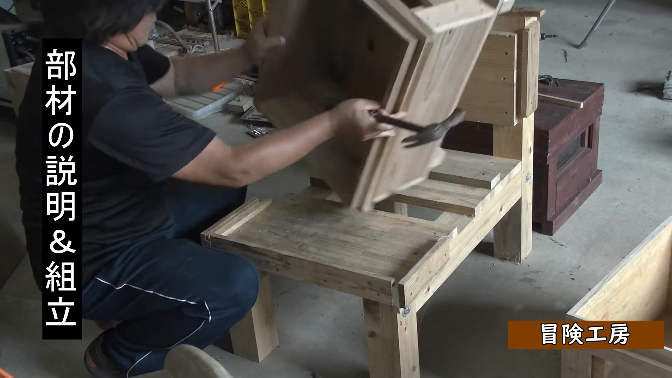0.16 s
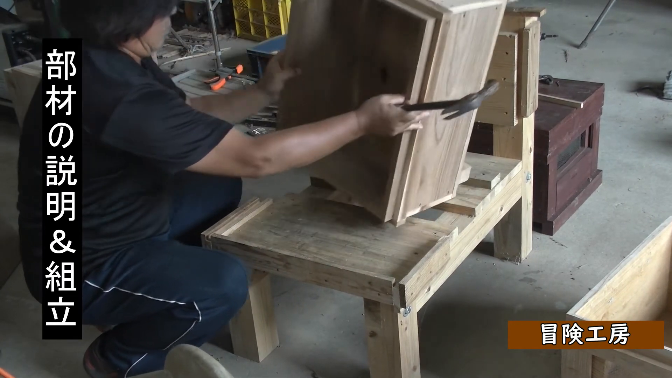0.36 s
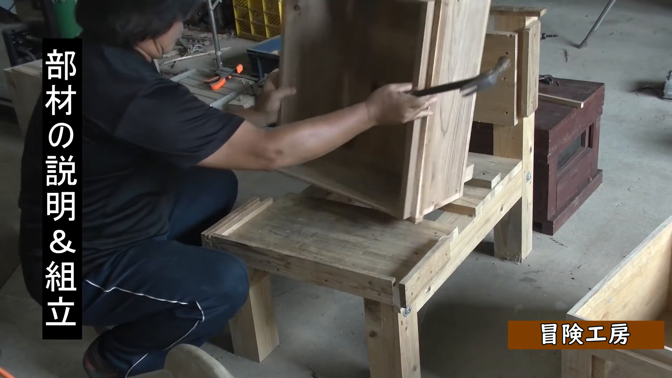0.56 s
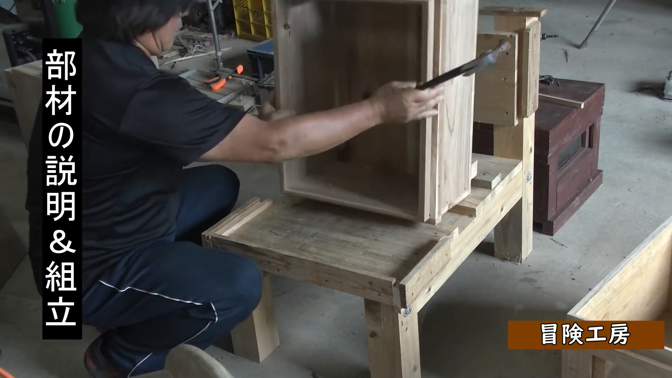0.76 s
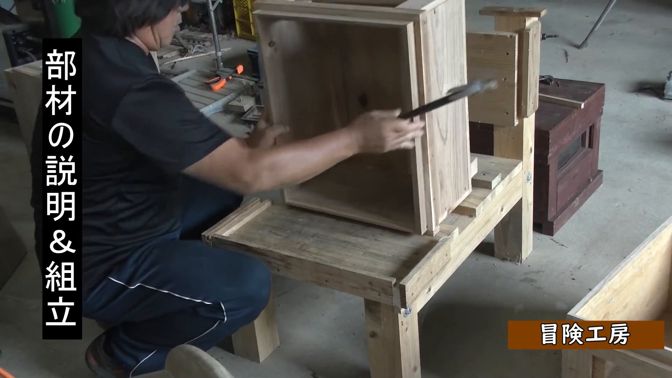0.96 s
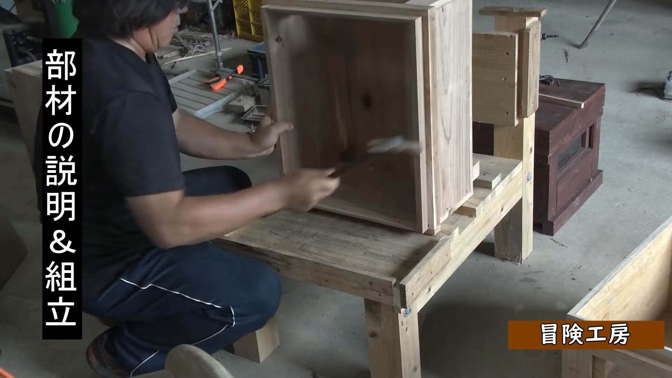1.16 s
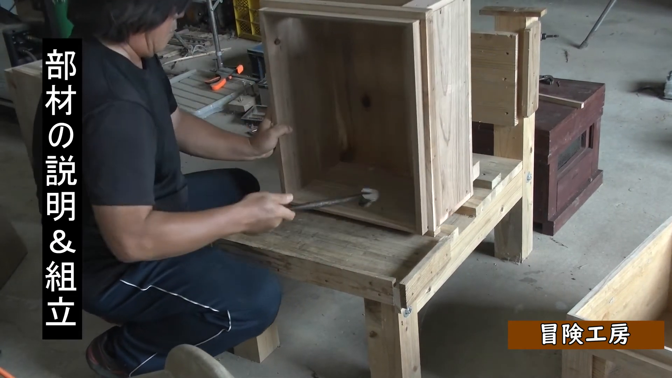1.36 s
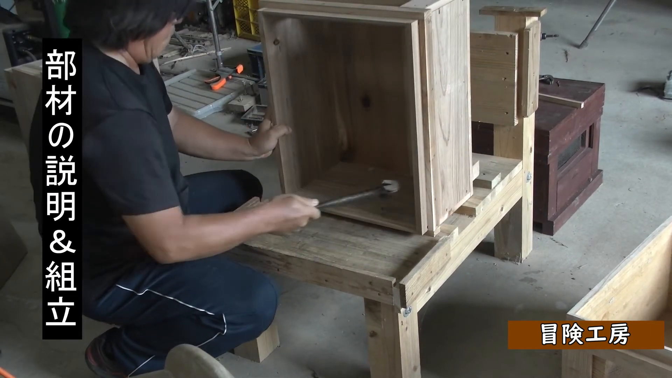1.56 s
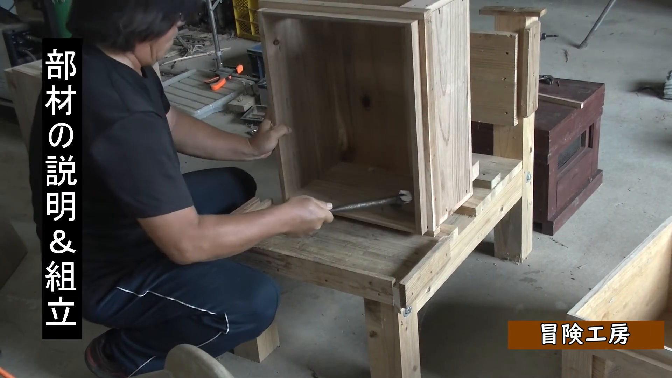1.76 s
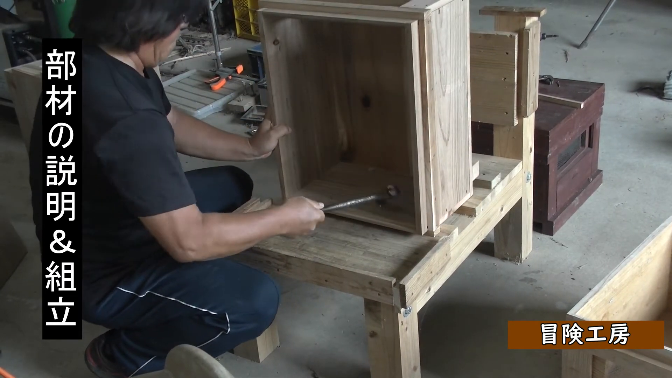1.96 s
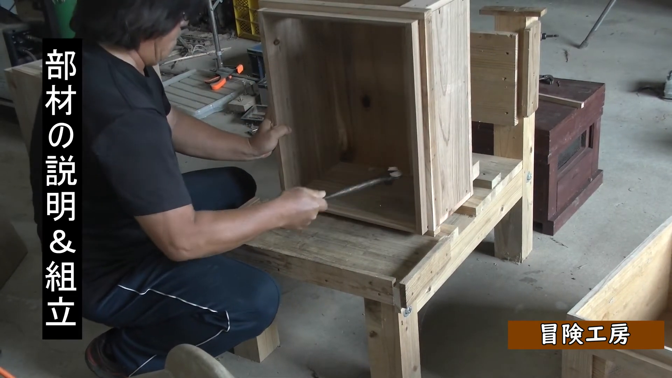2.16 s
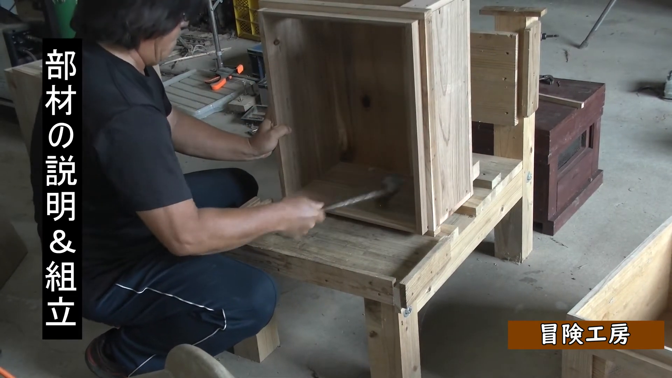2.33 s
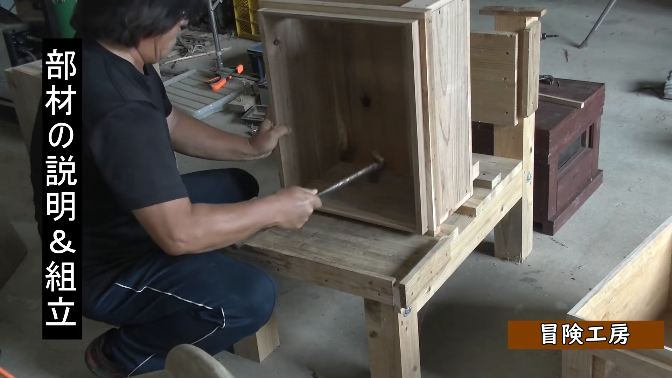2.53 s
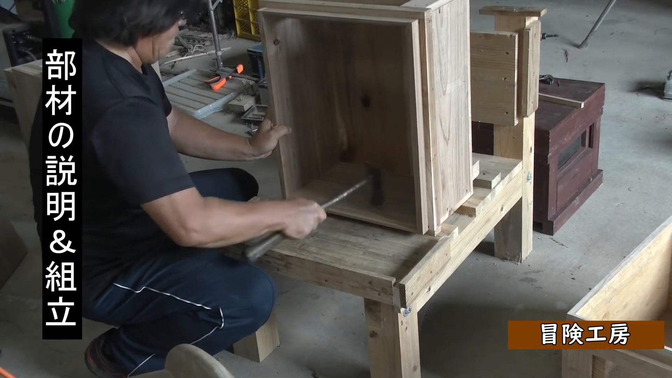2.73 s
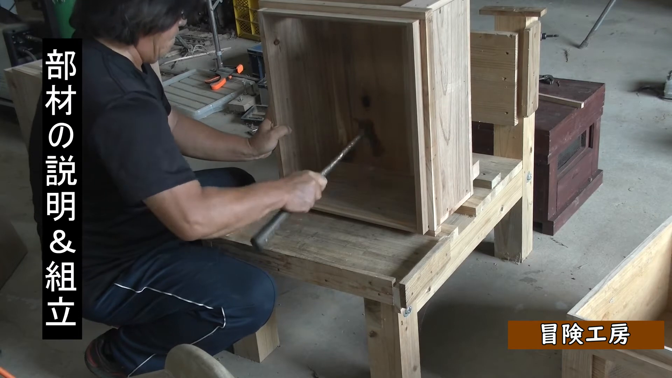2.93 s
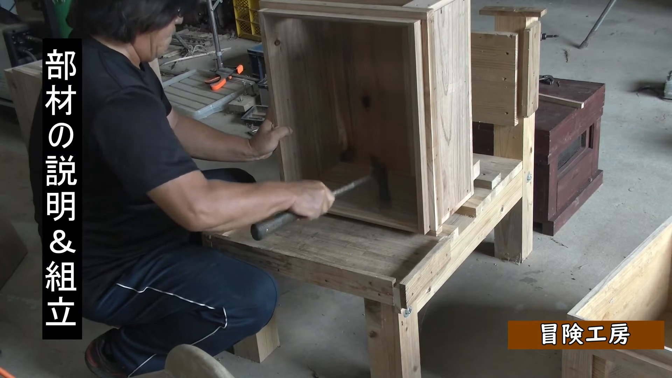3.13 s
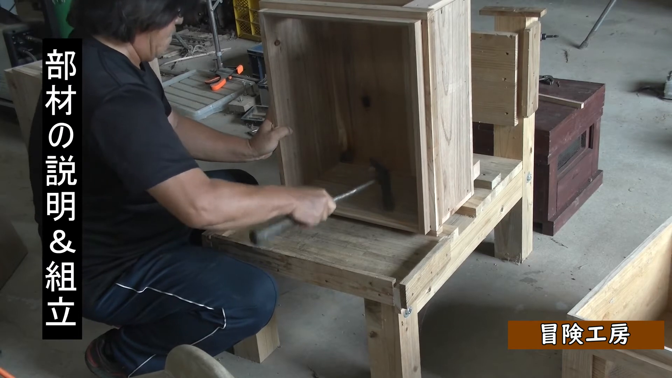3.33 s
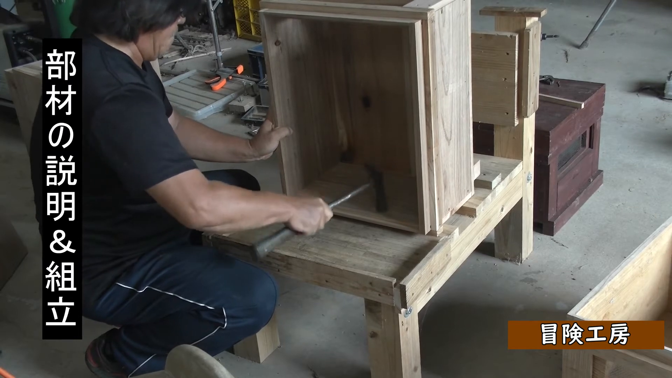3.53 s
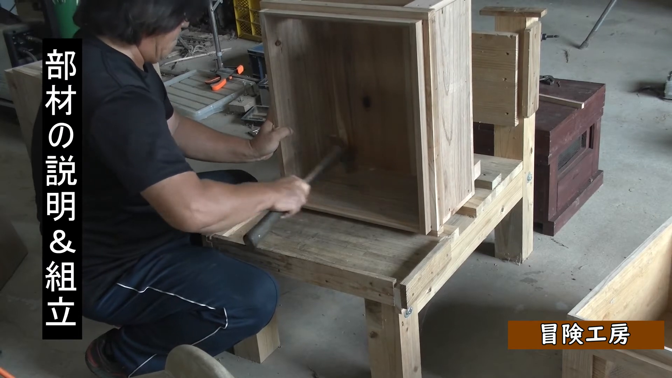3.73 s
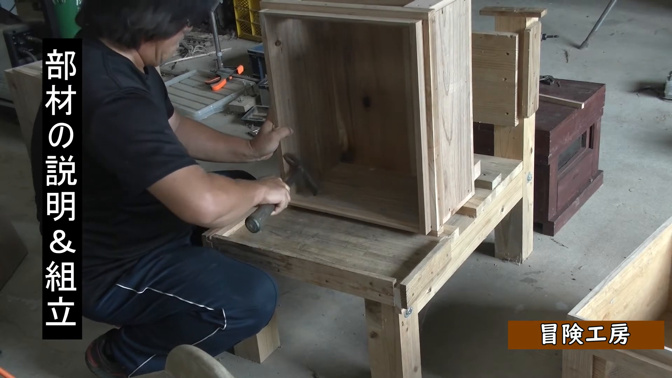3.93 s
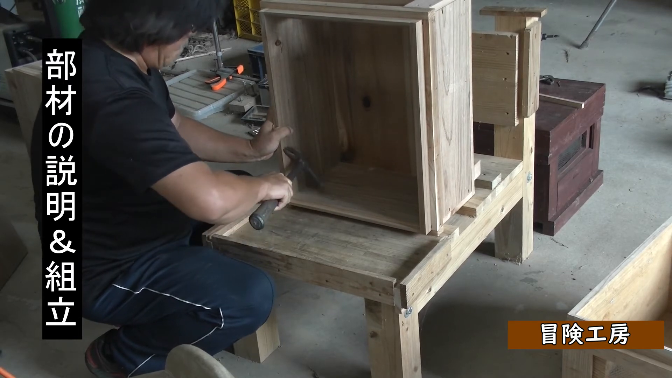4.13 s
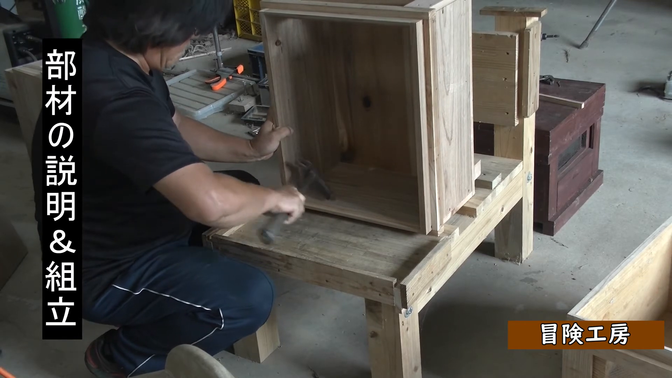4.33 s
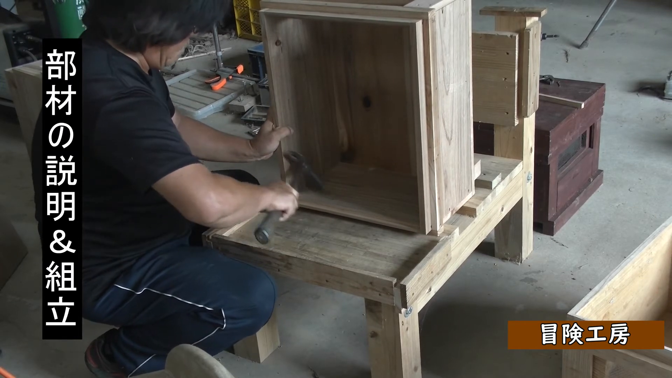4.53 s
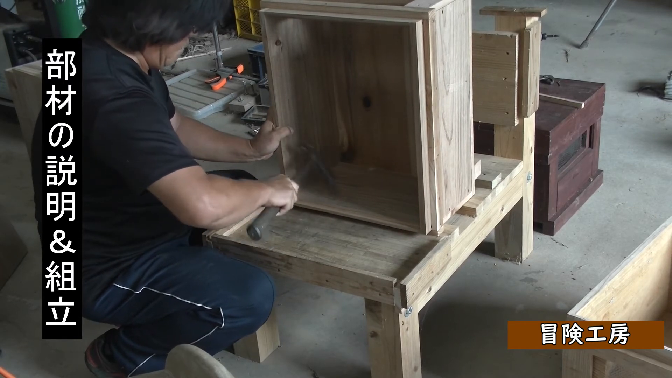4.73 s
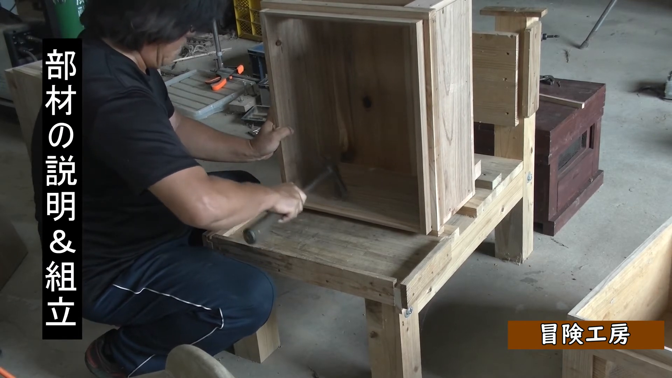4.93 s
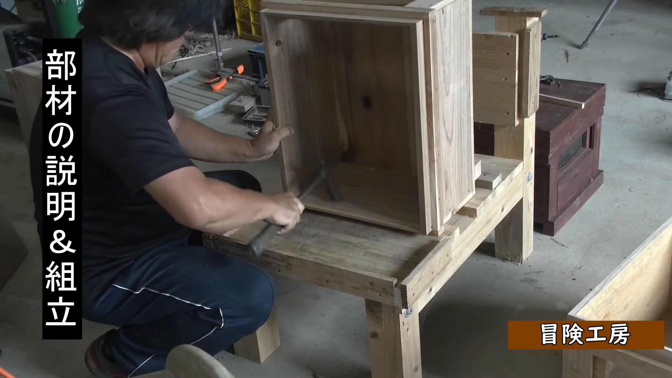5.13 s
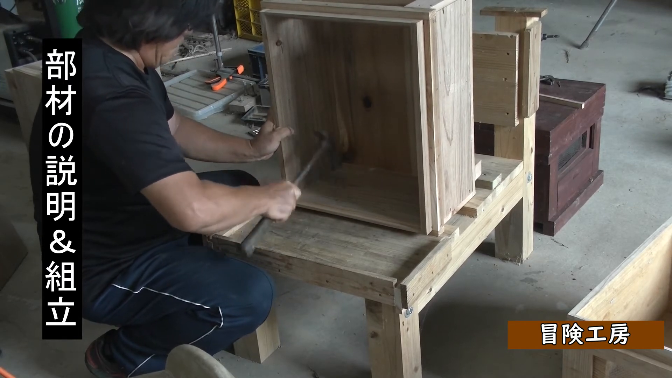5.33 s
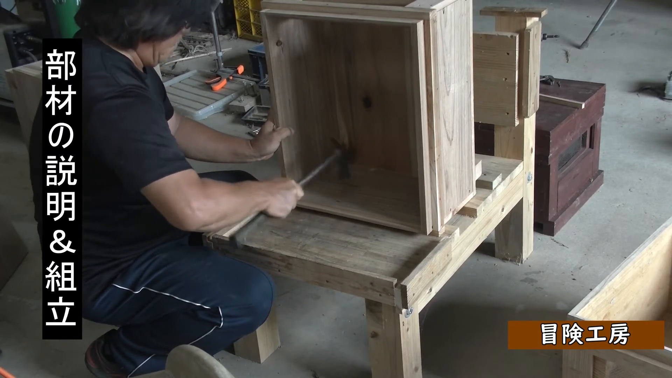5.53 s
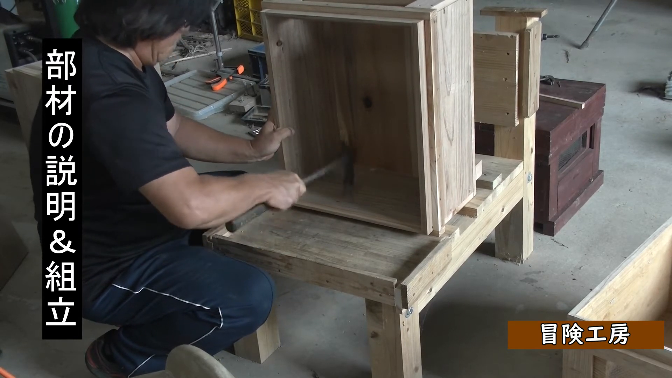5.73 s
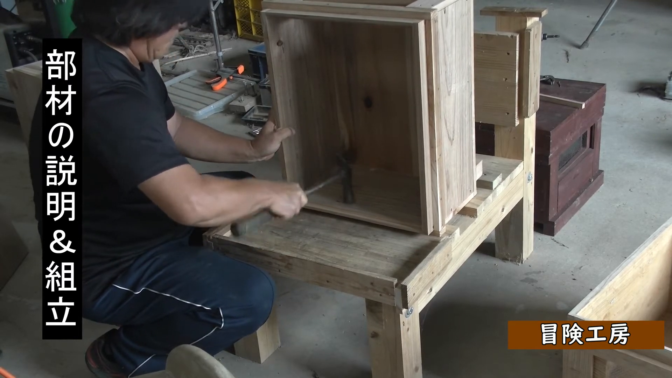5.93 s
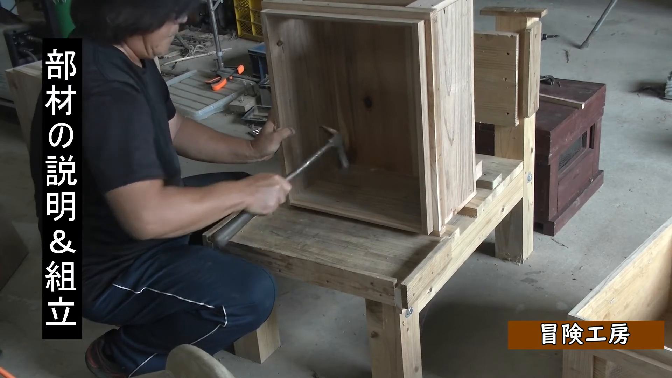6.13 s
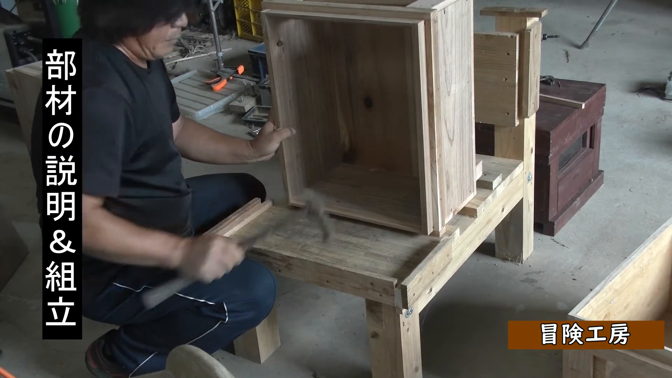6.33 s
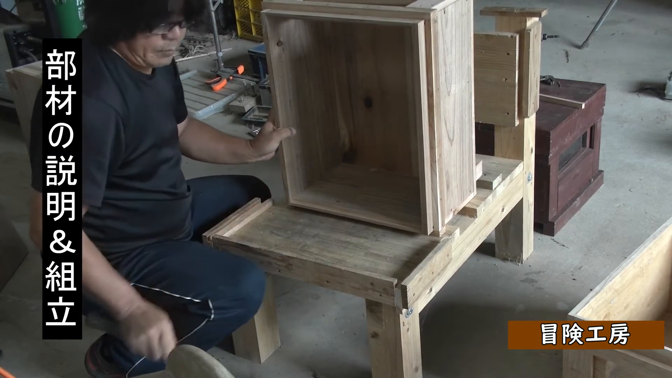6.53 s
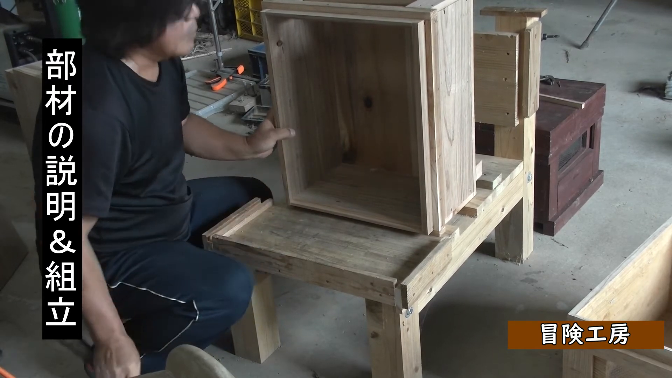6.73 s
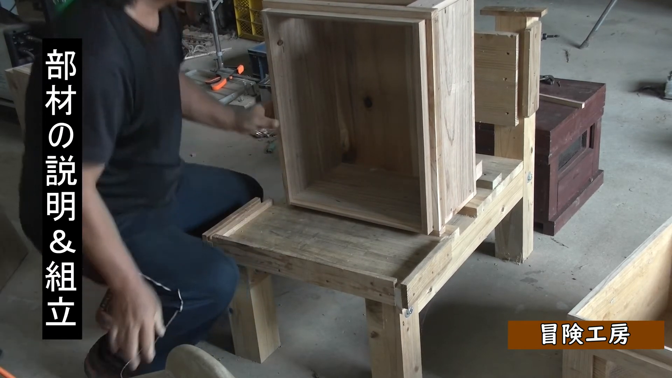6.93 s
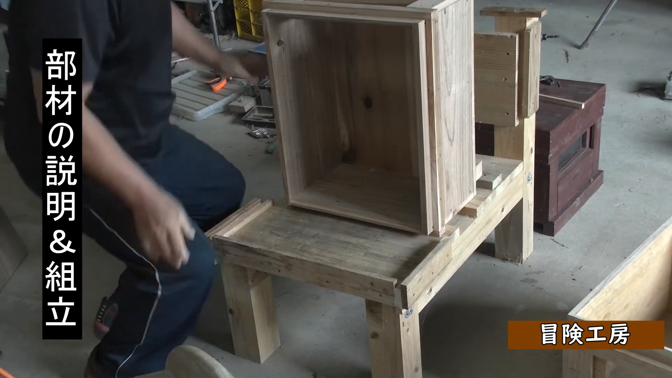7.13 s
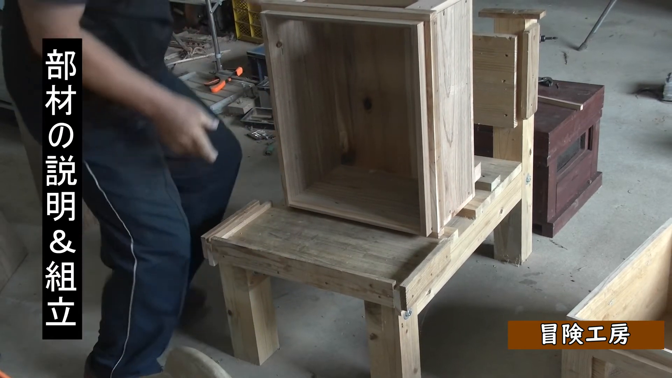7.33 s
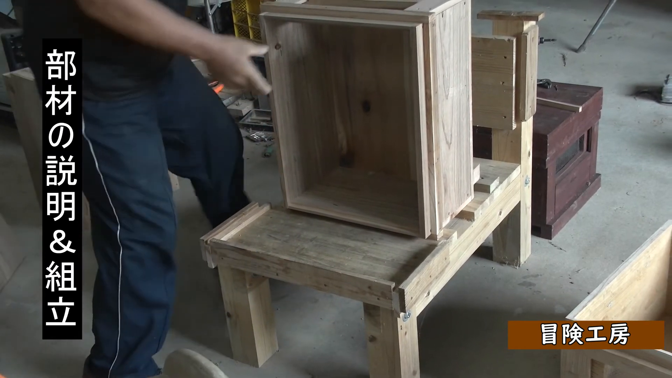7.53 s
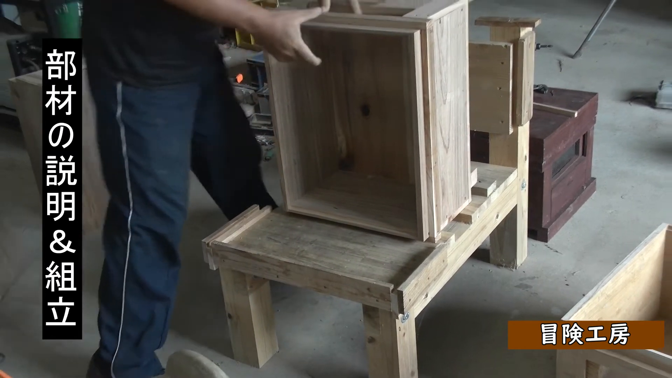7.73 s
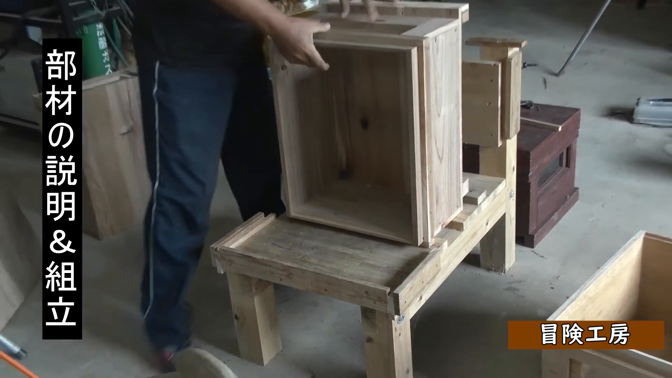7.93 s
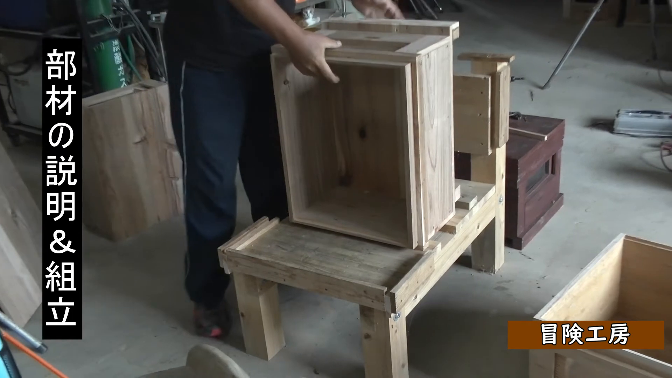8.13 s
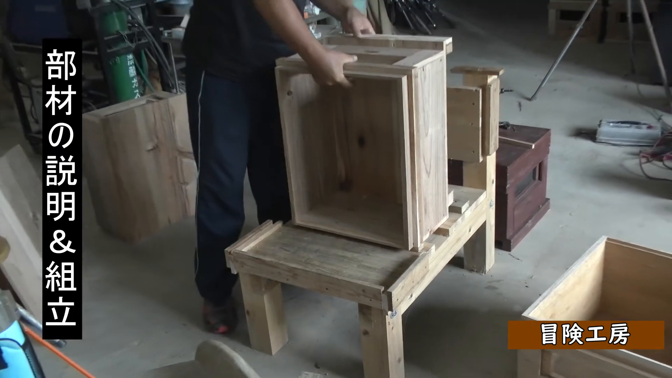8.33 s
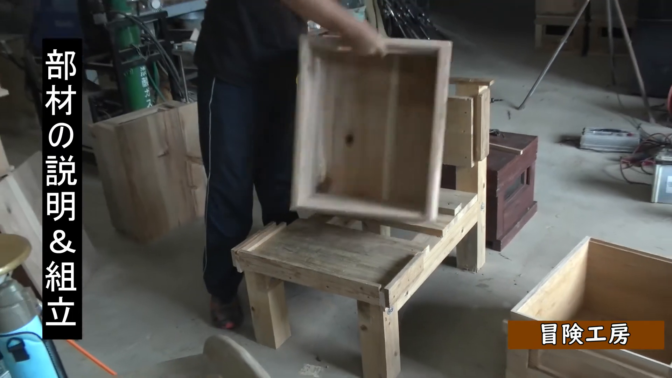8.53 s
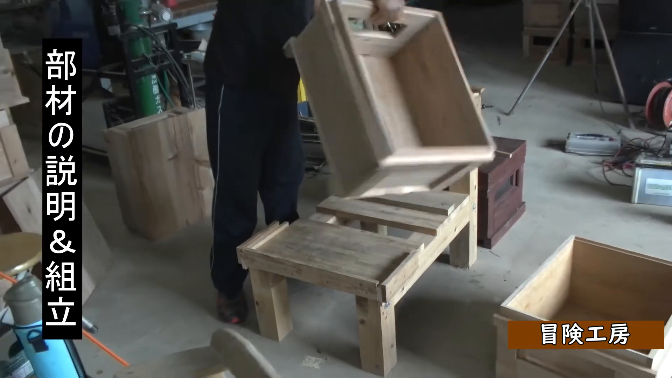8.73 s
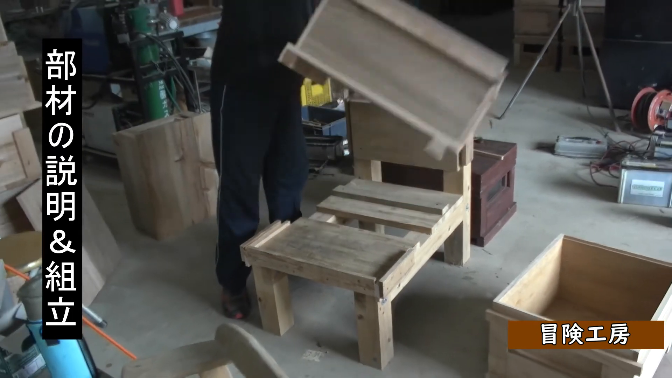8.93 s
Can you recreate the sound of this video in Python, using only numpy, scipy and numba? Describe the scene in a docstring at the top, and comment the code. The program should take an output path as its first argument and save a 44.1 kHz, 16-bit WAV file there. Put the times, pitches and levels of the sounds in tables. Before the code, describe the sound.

In a hard-walled workshop, a wooden box bumps down on a low bench and rattles to rest. A claw hammer cracks against its panels, spaced at first, then faster, pauses, and resumes with light taps growing hard. The hammer clatters onto the floor, two dull steps follow, and a board claps sharply. A far machine whines over soft hiss. Close stereo pickup; loud knocks are squashed and the room swells behind them.

```python
"""A wooden box is set down on a low bench in a hard-walled workshop and rocks to rest. A claw hammer knocks its
panels home, close to a microphone pair, and the box hops under the blows; then the hammer is laid on the floor,
steps follow, and a board is clapped on the box. Struck things sound as damped modes plus a crack of noise.
A limiter ducks the loud knocks, so the room swells up behind them.
Throughout, a far machine whines, flaring now and then into a clear tone, over a filtered-noise outdoor hiss."""
import sys
import numpy as np
from scipy import signal
from scipy.fft import rfft, irfft, next_fast_len
from scipy.io import wavfile
from numba import njit

SR = 44100
rng = np.random.default_rng(int(sys.argv[2]) if len(sys.argv) > 2 else 0)


def to_wav(sig):
    """Store sig (one row per channel, or 1-D mono) as 16-bit WAV at the path in sys.argv[1].

    Samples outside -1..1 are clipped; the rate is SR.
    """
    pcm = np.clip(np.atleast_2d(sig), -1, 1) * 32767
    pcm = np.round(pcm).astype(np.int16)
    wavfile.write(sys.argv[1], SR, pcm.T)  # frames by channels


N = 399987  # length in samples

# All levels are relative ones, ahead of the limiter; boom and brightness tilt the bass and the treble of a knock.
# Hammer blows. Each row: start in seconds, strength in dB, brightness in dB, ping of the steel head in dB.
BLOWS = [(1.9771, 4.5, -7, 4.5), (2.3754, -1, 5, 4.5), (2.738, 15.5, -4, -1), (3.0612, 12, -6.5, 6.5),
         (3.3235, 15, -2, 5.5), (3.5647, 14, -6, 0.5), (4.3178, 1.5, -8, 0.5), (4.6027, -5, -10, 5),
         (4.8969, -1, -3, 10), (5.1683, 8, -5, 2.5), (5.4205, 3, 1.5, 1), (5.6527, 12, -5, -1),
         (5.9126, 14, 3, 8)]
# The hammer falling back on the panel. Each row: start in seconds, strength in dB, boom in dB, brightness in dB.
REBOUNDS = [(3.1226, 6.5, -3, -12.5), (4.4667, -15, 13, -4), (4.6595, -10.5, 6, -4)]
# Modes of the panel. Each row: frequency in Hz, 60 dB decay time in seconds, level in dB.
PANEL_MODES = [(187.1, 0.33, -36), (244.3, 0.087, -27), (303, 0.089, -20.5), (429.7, 0.13, -18),
               (697, 0.09, -18), (897, 0.024, -7), (1200, 0.0087, 1), (1302, 0.019, 0), (1700, 0.014, -24),
               (2700, 0.012, -8), (3670, 0.024, -16.5)]
# The panel's dense crack. Each row: frequency in Hz, level in dB, 60 dB decay time in seconds.
PANEL_CRACK = [(41.16, -42, 0.03), (120, -21.5, 0.13), (333, 3, 0.043), (890, 5.5, 0.046),
               (1550, 13, 0.038), (2510, 4, 0.035), (3860, 4, 0.017), (6660, -11, 0.024),
               (8000, -14.5, 0.023), (12000, -38, 0.004), (16100, -37, 0.007)]
# Modes of the steel head. Each row: frequency in Hz, 60 dB decay time in seconds, level in dB.
STEEL_MODES = [(6950, 0.029, -31.5), (9090, 0.0047, -26), (9770, 0.02, -26.5), (10310, 0.024, -31),
               (11260, 0.012, -31)]
# The tick of steel. Each row: frequency in Hz, level in dB, 60 dB decay time in seconds.
STEEL_TICK = [(1500, -48, 0.018), (4000, -27.5, 0.0067), (6340, -21, 0.039), (8340, -18.5, 0.0092),
              (10100, -13, 0.021), (12900, -24, .012), (16000, -43, 0.0092)]
BOOM_DB, BOOM_SLOPE = 6.5, -0.42  # boom under a 0 dB blow, and its change per dB: harder blows boom less


def hammer():
    """Impact excitation: each blow cracks and booms in the panel and pings the steel head, which may fall back."""
    blows = [(s, db, BOOM_DB + BOOM_SLOPE * db, bright_db) for s, db, bright_db, _ in BLOWS]
    pings = [(s, ping_db, 0, 0) for s, _, _, ping_db in BLOWS]
    # the open box faces the microphone, which so hears more of the panel's ring than of its crack
    panel = knocks(blows + REBOUNDS, PANEL_MODES, PANEL_CRACK, contact_s=0.00065, room_db=-0.5, crack_db=-3)
    head = knocks(pings, STEEL_MODES, STEEL_TICK, contact_s=0.00017, room_db=4.0)
    return panel + head


# The box set down or jolted on the bench.
# Each row: start in seconds, strength in dB, boom in dB, brightness in dB.
LANDINGS = [(.357, -13, 2, 11.5), (.6835, -4, 7, 4), (.929, -7, 7.5, 5), (.9465, -3.5, 8, -1),
            (2.807, 13, -15, -7), (4.383, -14, -5, 13), (4.413, -6.5, -1, -8)]
# Modes of the bench. Each row: frequency in Hz, 60 dB decay time in seconds, level in dB.
BENCH_MODES = [(148, 0.3, -28), (187.3, 0.17, -14.5), (323.5, 0.22, -26), (367, 0.04, -36),
               (514, 0.13, -25), (574, 0.031, -37), (1035, 0.01, -0.5), (1240, 0.024, -7)]
# The bench's dense crack. Each row: frequency in Hz, level in dB, 60 dB decay time in seconds.
BENCH_CRACK = [(40, -14, 0.061), (119, -12, 0.14), (526, 6.5, 0.052), (1440, 0.5, 0.088), (2540, -3, 0.026),
               (4570, -24, 0.13), (10100, -28.5, 0.03), (16100, -55, .02)]


def box_on_bench():
    """Modal response of the bench, struck as the box lands, rocks and hops."""
    events = LANDINGS + rocking() + hops()
    return knocks(events, BENCH_MODES, BENCH_CRACK, contact_s=0.0015, room_db=-2.0)


ROCK_START_S, ROCK_GAP_S, ROCK_GAP_RATIO = 1.107, 0.12, .65  # each swing is shorter than the last
ROCK_DB, ROCK_LOSS_DB, ROCK_BOOM_DB, ROCK_BRIGHT_DB = -16.5, 7, 14, 5  # first swing, loss per swing, colour
CORNER_S, CORNER_DB, CORNER_BOOM_DB = .033, 0, 2.5  # a second corner follows each swing down


def rocking(count=4):
    """Geometric loss of energy: the box tips ever quicker and softer, landing on one corner and then the next."""
    rows, s = [], ROCK_START_S
    for k in range(count):
        db, shrink = ROCK_DB - k * ROCK_LOSS_DB, ROCK_GAP_RATIO ** k
        rows.append((s, db, ROCK_BOOM_DB, ROCK_BRIGHT_DB))
        rows.append((s + CORNER_S * shrink, db + CORNER_DB, CORNER_BOOM_DB, 0))
        s += ROCK_GAP_S * shrink
    return rows


HOP_S, HOP_POWER = .036, 0.36  # time in the air after a 0 dB blow; it grows as this power of the blow's force
HOP_DB, HOP_BOOM_DB, HOP_BRIGHT_DB = -14.5, -6.5, -5  # the landing's strength relative to the blow, and its colour


def hops():
    """Flight time grows with impulse: the harder the blow, the later and louder the box lands."""
    rows = []
    for s, db, _, _ in BLOWS:
        flight_s = HOP_S * undb(db) ** HOP_POWER
        rows.append((s + flight_s, db + HOP_DB, HOP_BOOM_DB, HOP_BRIGHT_DB))
    return rows


# The claw or shaft glancing off something hard.
# Each row: start in seconds, level in dB, pitch in Hz, 60 dB decay time in seconds.
CLINKS = [(4.397, -21, 3130, 0.017), (4.604, -10.5, 2880, 0.024), (4.66, -15.5, 4000, 0.03),
          (7.003, -11.5, 2090, .02), (7.1055, -11.5, 3660, 0.01)]


def clinks(overtone=1.4, overtone_db=-14, tick_db=-4):
    """Resonance of touched steel: two brief partials whose pitch and length depend on where it is touched."""
    tick = [(hz, db + tick_db, t60) for hz, db, t60 in STEEL_TICK]
    total = 0
    for s, db, hz, t60 in CLINKS:
        modes = [(hz, t60, 0), (overtone * hz, t60 / 2, overtone_db)]
        total = total + knocks([(s, db, 0, 0)], modes, tick, contact_s=0.00033, room_db=-4.5)
    return total


# The hammer laid on the floor, and other small clacks.
# Each row: start in seconds, strength in dB, boom in dB, brightness in dB.
CLACKS = [(6.850, -19, 0, 6), (6.867, -9, -5.5, -1.5), (6.974, -20.5, 2, 4), (7.003, -11.5, -15, 6),
          (7.1055, -36, -8, 23.5), (7.224, -24, 1, 5.5), (7.382, -29.5, 3.5, -9), (8.421, -22, -34, 7.5)]
# Modes of the handle. Each row: frequency in Hz, 60 dB decay time in seconds, level in dB.
HANDLE_MODES = [(930, 0.03, -8), (1340, 0.015, -7), (1570, 0.018, -3.5), (2054, 0.042, -13),
                (2765, 0.036, -15), (3430, 0.017, -30)]
# The handle's dense crack. Each row: frequency in Hz, level in dB, 60 dB decay time in seconds.
HANDLE_CRACK = [(50, -15, 0.046), (131, -1, 0.13), (292, 2, 0.031), (680, 7.5, 0.077), (2160, 6, 0.053),
                (4400, -10.5, 0.055), (6150, -11, 0.084), (8900, -27, 0.032), (9600, -10, 0.025),
                (15900, -57, 0.015)]


def clacks():
    """Modal response of the hammer's handle as it meets the floor."""
    return knocks(CLACKS, HANDLE_MODES, HANDLE_CRACK, contact_s=0.0016, room_db=1.0)


# Footfalls on the concrete. Each row: start in seconds, strength in dB, boom in dB, brightness in dB.
STEPS = [(7.533, -16, -7.5, -4), (7.668, -12.5, -17.5, 9)]
# Modes of the sole. Each row: frequency in Hz, 60 dB decay time in seconds, level in dB.
SOLE_MODES = [(110, 0.051, -11), (190, .03, -9), (290, 0.019, -19)]
# The sole's dense thud. Each row: frequency in Hz, level in dB, 60 dB decay time in seconds.
SOLE_THUD = [(40.5, 14, 0.069), (189, 22.5, 0.04), (600, 7.5, 0.031), (1510, -9, 0.023), (8000, -38, 0.019)]


def footsteps():
    """Heavy damping: a sole on concrete gives a short, low thud."""
    return knocks(STEPS, SOLE_MODES, SOLE_THUD, contact_s=0.0014, room_db=-7.5)


# A loose board clapped on top of the box, touching first and rattling once.
# Each row: start in seconds, strength in dB, boom in dB, brightness in dB.
CLAPS = [(7.86, -16, -2, -6), (7.8645, 6, 5, 6), (7.877, -6, 6, -3)]
# Modes of the board. Each row: frequency in Hz, 60 dB decay time in seconds, level in dB.
BOARD_MODES = [(196, 0.15, -34.5), (496, 0.15, -29), (670, 0.087, -18.5), (970, 0.038, -12),
               (1207, 0.035, -8.5), (1500, 0.019, -10), (2840, 0.016, -13.5), (3400, 0.0057, -15)]
# The board's dense crack. Each row: frequency in Hz, level in dB, 60 dB decay time in seconds.
BOARD_CRACK = [(40, -16, 0.024), (296, -17, 0.047), (620, 4, 0.087), (2920, -1.5, 0.023), (4740, -6, 0.015),
               (7000, -15.5, 0.0071), (8500, -33, 0.009), (9900, -23, 0.01), (16000, -49, .01)]


def board():
    """Modal response of a loose board to three contacts in quick succession."""
    return knocks(CLAPS, BOARD_MODES, BOARD_CRACK, contact_s=0.0011, room_db=3)


# Wood and grit sliding on wood.
# Each row: start in seconds, length in seconds, level in dB, centre frequency in Hz.
SLIDES = [(0.852, 0.1, -34.5, 2410), (7.782, 0.088, -40, 554), (7.785, 0.074, -37, 2360),
          (7.787, 0.092, -48, 10500), (7.973, 0.13, -48, 10000), (8.57, 0.23, -55.5, 540),
          (8.877, 0.11, -55, 5100)]


def slides(grain_db=1.0, octaves=0.76):
    """Friction noise: a band of noise, made grainy by an uneven grip, as the box and the board are shifted."""
    track, t = np.zeros(N), np.arange(SR // 2) / SR
    for s, length, db, centre_hz in SLIDES:
        def band(f):
            bell = np.exp(-(np.log2((f + 1) / centre_hz) / octaves) ** 2)
            return bell / (1 + (f / 11000) ** 8)

        rub = tinted_noise(band, len(t))
        grip = undb(grain_db * tinted_noise(lambda f: 1 / (1 + (f / 150) ** 2), len(t)))
        swell = np.sin(np.pi * np.minimum(t / length, 1))
        add(track, s, undb(db) * rub * grip * swell)
    return track


def knocks(events, modes, crack, contact_s, room_db, crack_db=0, count=12000):
    """Modal synthesis: each knock rings the modes and a crack. Rows: towards the microphone, into the room."""
    direct, spread = np.zeros(N), np.zeros(N)
    t, f = np.arange(count) / SR, np.fft.rfftfreq(count, 1 / SR)
    all_round_db = radiated_db(f, modes, crack) + room_db
    for s, db, boom_db, bright_db in events:
        tilt = lambda hz: on_log(hz, [330, 1300, 3800], [boom_db, 0, bright_db])
        burst = fading_noise(crack, t, tilt) * (1 - np.exp(-t / contact_s))
        add(direct, s, undb(db) * (ring(modes, t, tilt) + undb(crack_db) * burst))
        add(spread, s, pulse(db + all_round_db + tilt(f)))
    return np.array([direct, spread])


def ring(modes, t, tilt=lambda hz: 0, detune=0.019, scatter_db=4.5, rise_cycles=1.95):
    """Damped modes, a little different at each spot; bending waves bring the highs first and the lows later."""
    out = 0
    for (hz, t60, db), (a, b) in zip(modes, rng.standard_normal((len(modes), 2))):
        cycles = hz * (1 + detune * a) * t
        gain = undb(db + tilt(hz) + scatter_db * b)
        rise = 1 - np.exp(-cycles / rise_cycles)
        out = out + gain * np.sin(2 * np.pi * cycles) * fade(t, t60) * rise
    return out


def fading_noise(bands, t, tilt=lambda hz: 0):
    """Frequency-dependent decay: a noise burst whose bands each die at their own rate."""
    hz, db, t60 = np.transpose(bands)
    f = np.fft.rfftfreq(len(t), 1 / SR)
    spectrum = rfft(rng.standard_normal(len(t))) * undb(on_log(f, hz, db) + tilt(f))
    out = 0
    for share, life in zip(np.eye(len(hz)), t60):  # each band's share crossfades into its neighbours'
        out = out + irfft(spectrum * on_log(f, hz, share), len(t)) * fade(t, life)
    return out


def fade(t, t60):
    """Exponential free decay, 60 dB down after t60."""
    return np.exp(-np.log(1000) * t / t60)


def radiated_db(hz, modes, crack):
    """Power summation over all directions: the modes' peaks on the crack, with no notches between."""
    crack_hz, crack_db, crack_t60 = np.transpose(crack)
    crack_gain, crack_life = undb(on_log(hz, crack_hz, crack_db)), on_log(hz, crack_hz, crack_t60)
    power = crack_gain ** 2 * SR * crack_life / (4 * np.log(1000))
    for mode_hz, t60, db in modes:
        damping, offset = np.log(1000) / t60, 2 * np.pi * (hz - mode_hz)
        resonance = damping ** 2 + offset ** 2
        slow_rise = (damping + mode_hz) ** 2 + offset ** 2
        power = power + (undb(db) * SR / 2 * mode_hz) ** 2 / resonance / slow_rise
    return 10 * np.log10(power)


def pulse(db):
    """Minimum phase: the shortest causal pulse with the given spectrum, by folding its cepstrum."""
    cepstrum = irfft(np.log(undb(db)))
    half = len(cepstrum) // 2
    return irfft(np.exp(rfft(np.r_[cepstrum[0], 2 * cepstrum[1:half]], 2 * half)))


# The workshop's tail. Each row: frequency in Hz, level in dB, 60 dB decay time in seconds.
ROOM = [(50.3, -41, 0.96), (105, -45.5, 0.97), (219, -30, 0.96), (326, -30.5, 1.01), (450, -36.5, 1.12),
        (726, -36.5, 1), (1350, -42.5, 1.08), (1800, -37.5, 1.08), (3270, -38.5, 1.19), (3940, -45.5, 1.03),
        (6170, -39.5, 1.03), (9900, -48, 0.6), (16000, -44, 0.34)]


def workshop(x, build_s=0.0089, wide_hz=6000, side_db=-4):
    """Diffuse reverberation builds up and dies; the close microphone pair hears only its treble apart."""
    t = np.arange(3 * SR // 2) / SR
    mid, side = (fading_noise(ROOM, t) * (1 - np.exp(-t / build_s)) for _ in range(2))
    high_pass = signal.butter(1, min(wide_hz, SR / 3), "high", fs=SR, output="sos")
    side = undb(side_db) * signal.sosfilt(high_pass, side)
    return stereo(signal.fftconvolve(x, mid)[:N], signal.fftconvolve(x, side)[:N])


# The microphone pair. Each row: frequency in Hz, left minus right in dB.
MIC_BALANCE = [(120, 0), (280, -1.57), (600, -2.5), (1300, -3), (2600, -1.5), (5000, 1.5), (11000, 1.5)]


def lean(pair):
    """Interchannel level difference: the right hears more of the middle range, the left more of the treble."""
    count = next_fast_len(N + SR // 10)
    left_db = on_log(np.fft.rfftfreq(count, 1 / SR), *np.transpose(MIC_BALANCE))
    gains = undb(np.array([left_db, -left_db]) / 2)
    return irfft(rfft(pair, count) * gains, count)[:, :N]


# The whine's partials, from the fundamental up. Each row: level in dB, width in Hz.
WHINE_PARTIALS = [(-11, 99), (-7.5, 98), (-0.5, 125), (-22, 200)]
WHINE_HZ, WHINE_DB, WHINE_DRIFT = 1100, -49, .007  # mean pitch, level, rms share by which the pitch wanders


def machine(drift_hz=1.525, waver_db=-0.6):
    """Harmonic series: a far whine that wanders slightly in pitch and level."""
    phase = 2 * np.pi * np.cumsum(WHINE_HZ * (1 + WHINE_DRIFT * wander(drift_hz))) / SR
    whine = 0
    for k, (db, width_hz) in enumerate(WHINE_PARTIALS, 1):
        whine = whine + undb(db) * far_tone(k * phase, width_hz)
    return whine * undb(WHINE_DB + waver_db * wander(drift_hz))


# Clear tones near the whine's third partial. Each row: time of the top in seconds, pitch in Hz, level in dB.
FLARES = [(.28, 3330, -44), (4.195, 3375, -40.5), (6.52, 3450, -49), (7.19, 3440, -40.5),
          (7.581, 3340, -41), (8.13, 3434, -43), (8.679, 3340, -39), (8.919, 3280, -47), (9.04, 3430, -42)]
FLARE_S, FLARE_WIDTH_HZ = .055, 42  # time from the top to 1/e; width of the line


def flares():
    """Narrow-band tone under Gaussian envelopes: the whine swells briefly, by turns higher and lower."""
    t = np.arange(N) / SR
    swells = np.array([undb(db) * np.exp(-((t - s) / FLARE_S) ** 2) for s, _, db in FLARES])
    hz = np.array(FLARES)[swells.argmax(axis=0), 1]  # the strongest swell sets the pitch
    return swells.sum(axis=0) * far_tone(2 * np.pi * np.cumsum(hz) / SR, FLARE_WIDTH_HZ)


def far_tone(phase, width_hz, side_db=-7):
    """Multipath: a tone that many echo paths blur into a narrow band, a little different left and right."""
    a, b, c = (wander(width_hz / 2) for _ in range(3))
    mid = a * np.cos(phase) + b * np.sin(phase)
    return stereo(mid, undb(side_db) * c * np.cos(phase))


# Spectrum of the outdoor hiss. Each row: frequency in Hz, relative spectral density in dB.
HISS = [(30, 2), (90, 0), (200, 4), (400, 1.5), (850, -4), (1200, 7.5), (1650, -1), (2600, 9), (3800, -2),
        (4800, 4), (5400, 1), (6700, 7.5), (8300, -9), (10000, -8.5), (15000, -23.5)]
HISS_DB = -49  # mean level of the middle signal


def outdoors(waver_db=0.8, side_db=-6.0):
    """Filtered noise: a soft, wide, slowly wavering hiss through the open door."""
    hz, db = np.transpose(HISS)
    mid, side = (tinted_noise(lambda f: undb(on_log(f, hz, db)), next_fast_len(N))[:N] for _ in range(2))
    return stereo(mid, undb(side_db) * side) * undb(HISS_DB + waver_db * wander(0.99))


def wander(hz):
    """Low-passed noise: slow chance of rms about 1, its changes mostly below the given rate."""
    return tinted_noise(lambda f: 1 / (1 + (f / hz) ** 2), next_fast_len(N))[:N]


def tinted_noise(gain_of_hz, count):
    """Spectral shaping: noise of rms 1 with the given spectrum."""
    x = irfft(rfft(rng.standard_normal(count)) * gain_of_hz(np.fft.rfftfreq(count, 1 / SR)), count)
    return x / x.std()


def undb(db):
    """Decibels to amplitude gain."""
    return 10 ** (np.asarray(db) / 20)


def on_log(hz, points_hz, values):
    """Linear interpolation on a log-frequency axis."""
    return np.interp(np.log(hz + 1e-9), np.log(points_hz), values)


def add(track, start_s, sound):
    """Superposition: mix a sound into a track."""
    i = int(start_s * SR)
    track[i:i + len(sound)] += sound[:len(track) - i]


def stereo(mid, side):
    """Sum and difference: left and right from middle and side."""
    return np.array([mid + side, mid - side])


def scene():
    """Direct and reverberant field: everything near the bench sounds directly and through the room."""
    struck = hammer() + box_on_bench() + clacks() + footsteps() + board() + clinks()
    direct, spread = struck + slides()
    return lean(direct + workshop(spread)) + machine() + flares() + outdoors()


@njit
def follow(x, attack, release):
    """Peak follower with unequal time constants: quick up, slow down."""
    out, e = np.empty(len(x)), 0.
    for i in range(len(x)):
        e += (x[i] - e) * (attack if x[i] > e else release)
        out[i] = e
    return out


def record(dry, threshold_db=-7, attack_s=0.00078, release_s=0.025, ratio=9, low_cut_hz=115, top_hz=15400):
    """Gain reduction clamps fast and lets go slowly; the bass is cut, the overshoot rounded, the top cut off."""
    attack, release = (1 - np.exp(-1 / (seconds * SR)) for seconds in (attack_s, release_s))
    peak = follow(np.abs(dry).max(axis=0), attack, release)
    gain = np.minimum(1, undb(threshold_db) / peak) ** (1 - 1 / ratio)
    x = signal.sosfilt(signal.butter(2, low_cut_hz, "high", fs=SR, output="sos"), dry * gain)
    rounded = x / (1 + x ** 4) ** (1 / 4)  # soft saturation towards 1
    coupled = signal.sosfilt(signal.butter(1, 60, "high", fs=SR, output="sos"), rounded)
    return signal.sosfilt(signal.ellip(8, .2, 70, top_hz, fs=SR, output="sos"), coupled)


dry = scene()
out = record(dry)
to_wav(out)
```